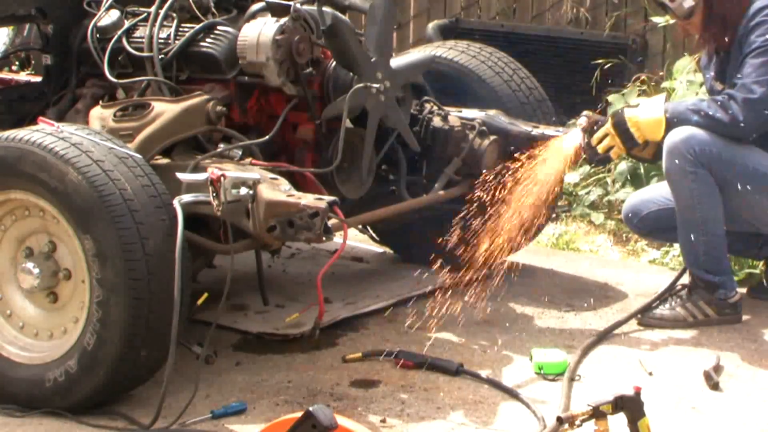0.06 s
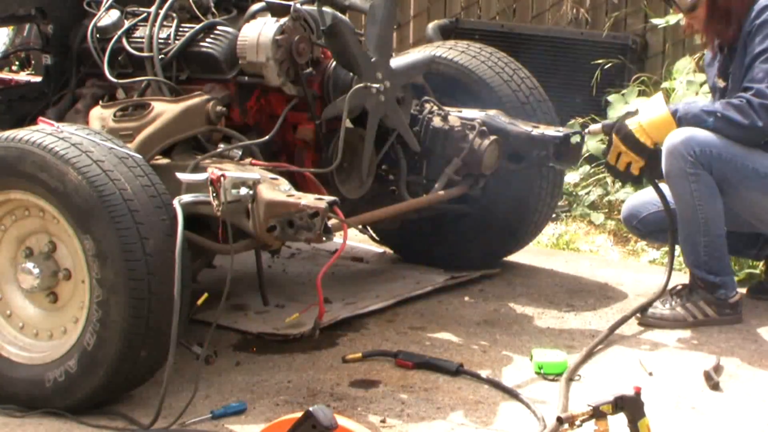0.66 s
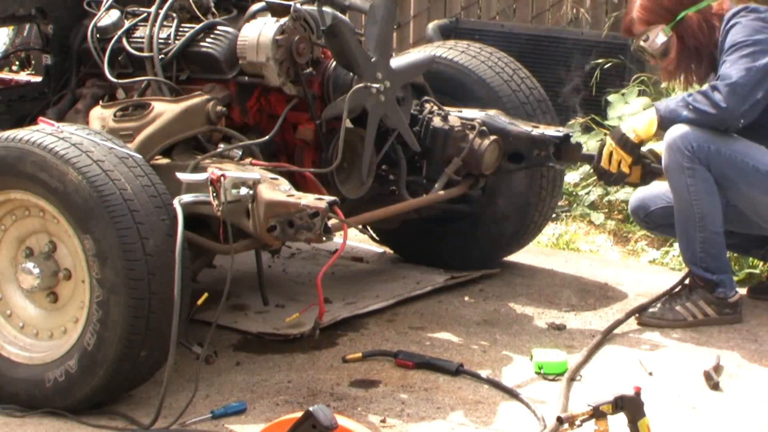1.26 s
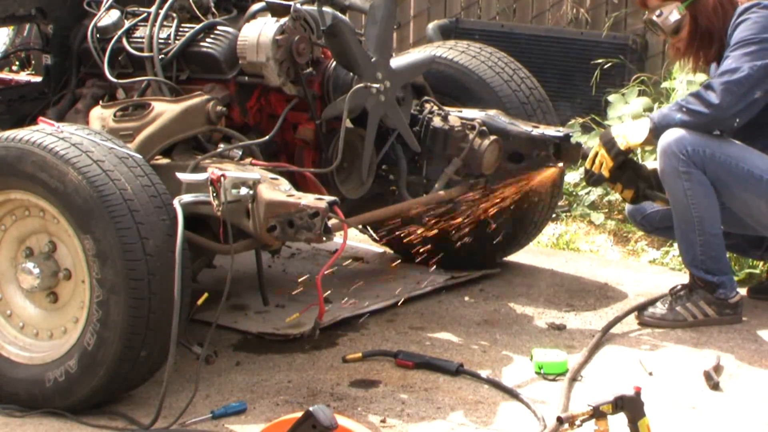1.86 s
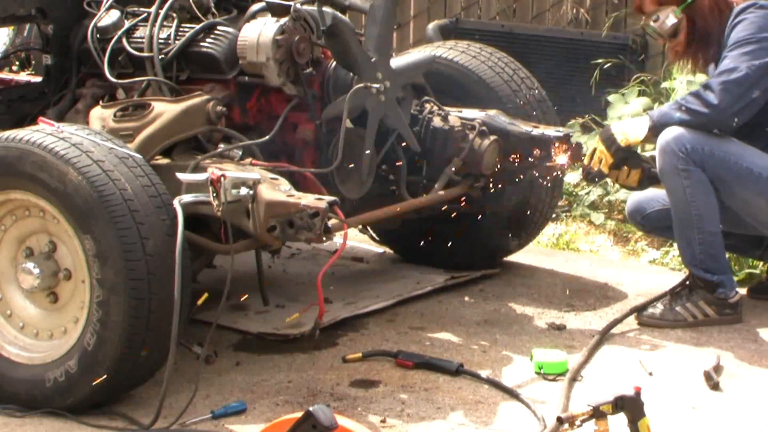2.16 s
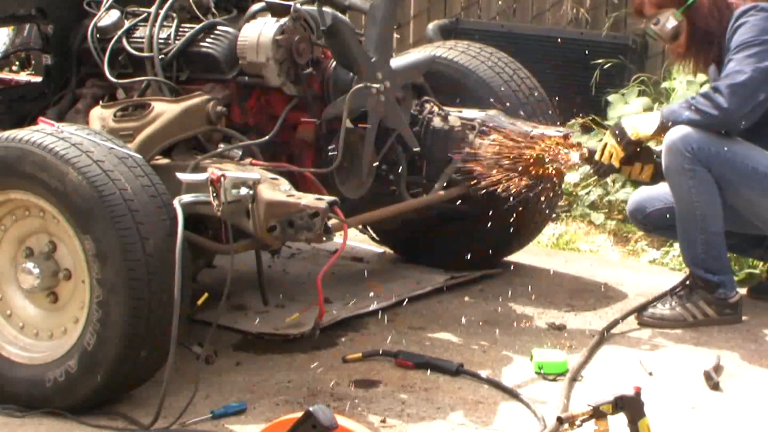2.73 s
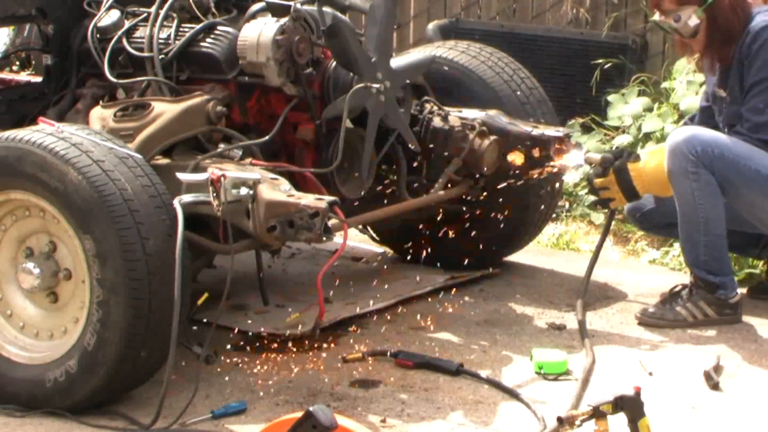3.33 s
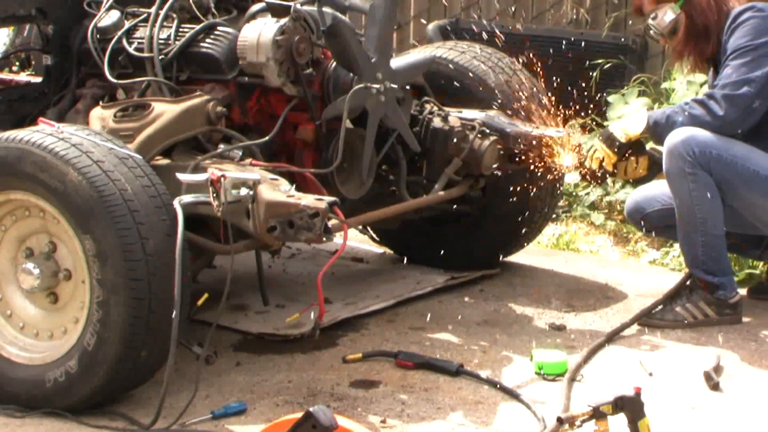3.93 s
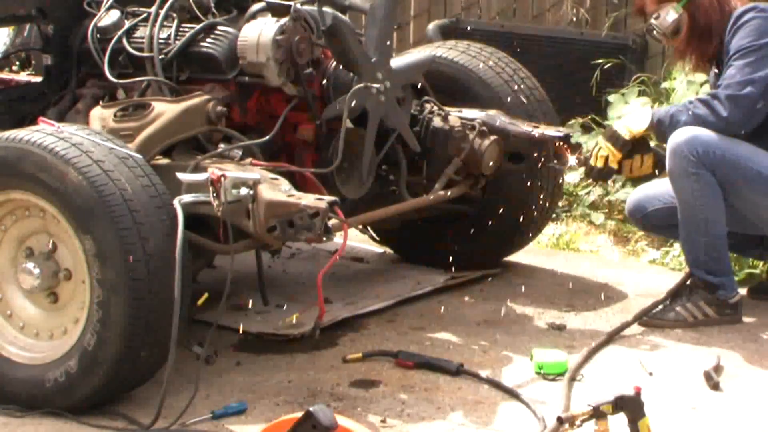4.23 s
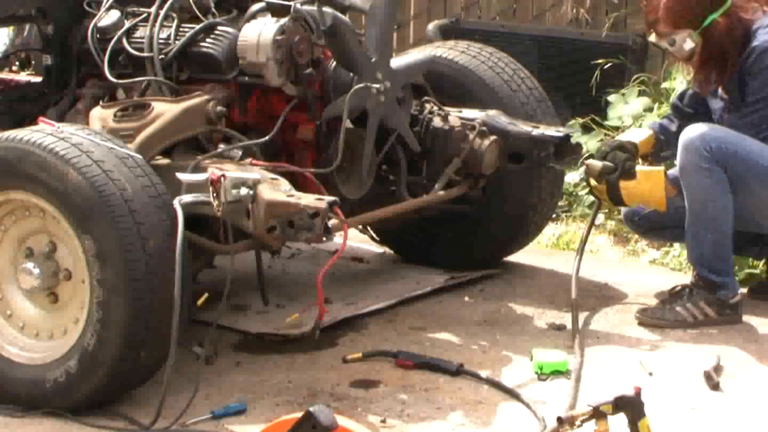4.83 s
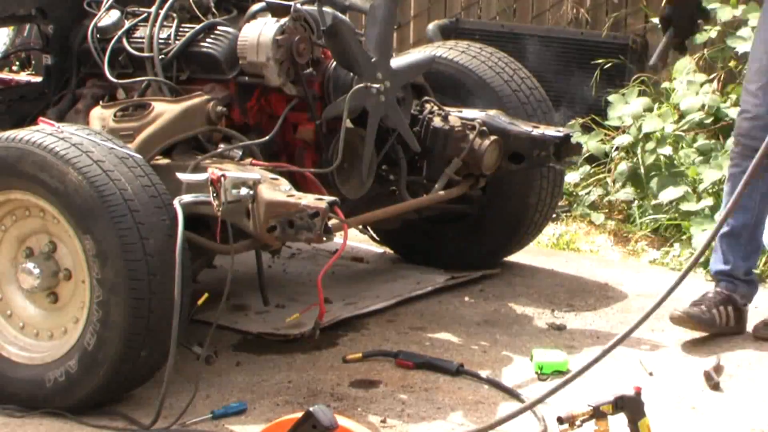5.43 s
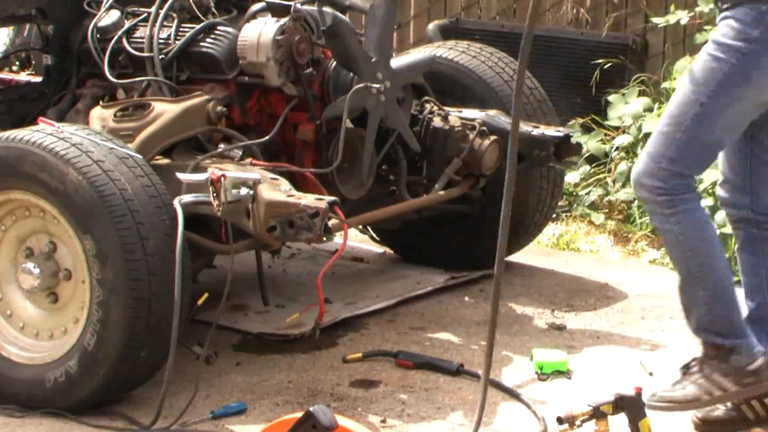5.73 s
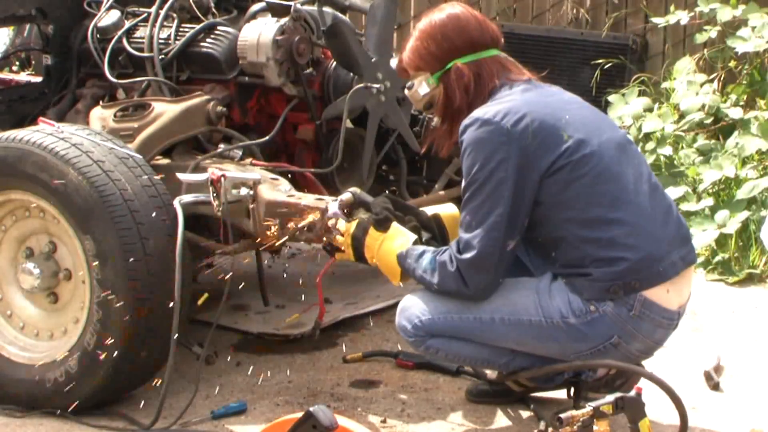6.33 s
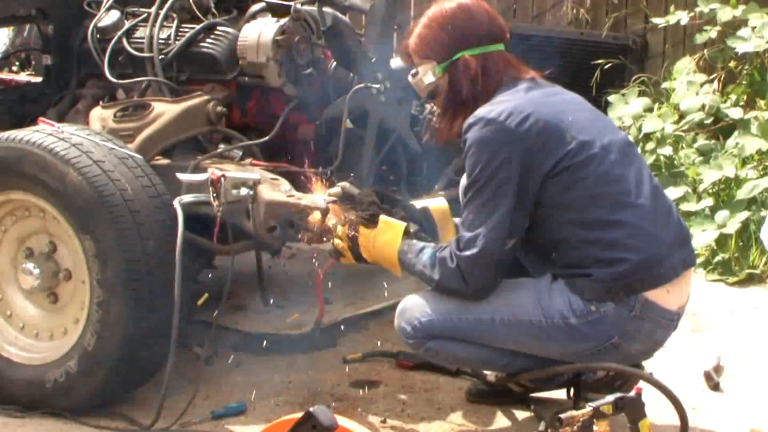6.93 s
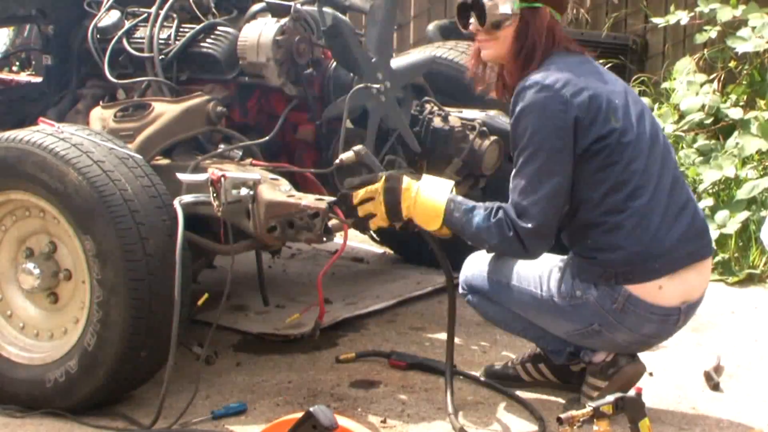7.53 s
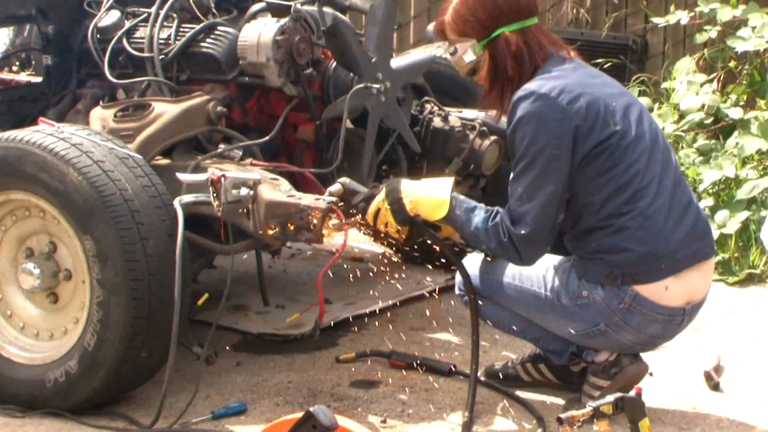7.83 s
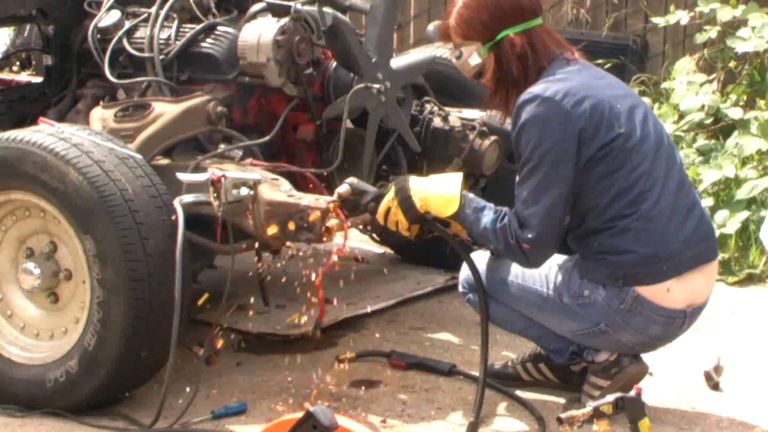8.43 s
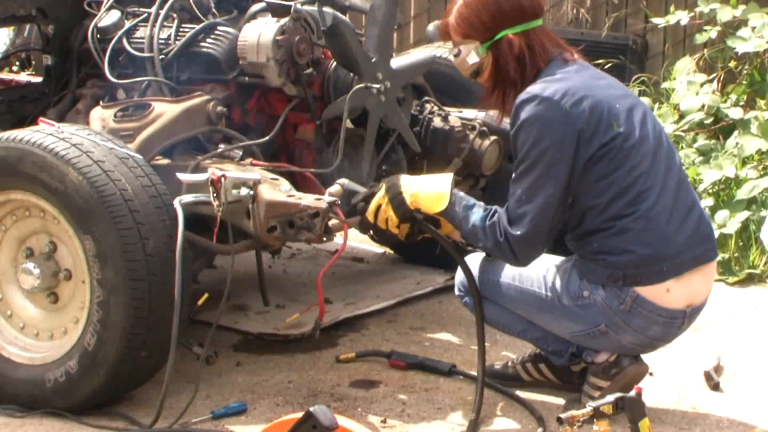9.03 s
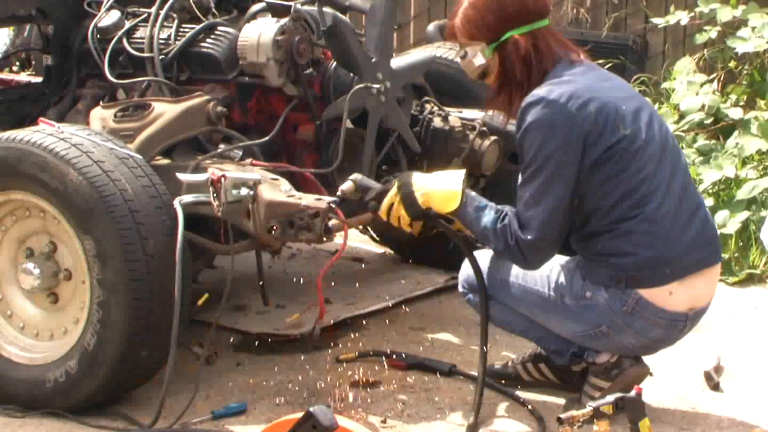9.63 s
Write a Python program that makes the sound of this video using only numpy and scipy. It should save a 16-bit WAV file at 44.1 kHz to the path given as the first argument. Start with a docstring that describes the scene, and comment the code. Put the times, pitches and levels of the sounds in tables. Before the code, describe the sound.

Outdoors in a yard, a plasma cutter works on a steel car frame, its air jet hissing and roaring with a fine spit of sparks. Short stabs and longer cuts follow, each led by a dry trigger click, while the machine hums and its fan rushes behind. Steel tinks once early on. A thin, raspy whine joins before halfway and stays through the longer closing cuts. One stereo microphone hears the torch slightly to the right.

```python
"""A yard, one stereo microphone on a plasma cutter at work on a steel car frame. A cut is under way:
the air jet hisses, roars on the steel and spits sparks, with the machine's hum and fan behind it.
Short stabs and longer cuts follow, each led by a click of the torch; steel tinks once at 1 s.
Near 4 s the machine starts a thin whine. From 5.5 s the worker crosses to the near side and crouches,
and roar and whine change colour. Throughout, the camera's limiter ducks the machine under each cut."""
import sys
import numpy as np
from scipy import signal
from scipy.io import wavfile
from scipy.ndimage import uniform_filter1d, minimum_filter1d

SR = 44100
rng = np.random.default_rng(int(sys.argv[2]) if len(sys.argv) > 2 else 0)


def pcm_store(signal):
    """Save signal as 16-bit PCM."""
    levels = np.round(np.clip(np.atleast_2d(signal), -1, 1) * 32767)
    wavfile.write(sys.argv[1], SR, levels.astype(np.int16).T)


N = 426888
T = np.arange(N) / SR

# Noise at the microphone. Each row: frequency in Hz, likeness of left and right (clipped to +-1).
STEREO_LIKENESS = [(25, -1.5), (45, 0.6), (80, 0), (150, 0.58), (500, 0.48), (1500, .5), (3000, .5),
                   (8000, 0.28), (13000, 0.25)]
# Its lean to one side. Each row: frequency in Hz, left minus right in dB.
STEREO_LEAN = [(30, 1), (200, -1.4), (700, -0.084), (2500, -0.057), (5000, -0.45), (9000, -1.1),
               (14000, -0.86)]
# The cuts. Each row: start and stop in seconds, hiss, roar and rumble in dB,
# rise and fall in seconds, air escaping afterwards in dB against full flow.
CUTS = [(-.1, 0.422, -32, -41.5, -51.5, .005, 0.016, -14.5),
        (0.575, 0.655, -28, -38, -47, 0.02, .002, -8.5),
        (.844, 0.908, -28.5, -37, -51, 0.025, 0.0085, -14.5),
        (1.61, 1.612, -36.5, -43, -62, 0.0036, 0.012, -10),
        (1.902, 2.006, -31.5, -42.5, -54, .011, .004, -8),
        (2.15, 3.07, -30.5, -42.5, -51, 0.011, 0.014, -35),
        (3.271, 3.442, -31.5, -41, -51.5, 0.01, .0035, -12),
        (3.724, 4.711, -33, -45, -52.5, 0.0045, 0.0032, -8),
        (4.976, 5.167, -27.5, -37.5, -47.5, 0.024, .0026, -13.5),
        (6.256, 7.221, -32.5, -42, -53, .002, 0.0035, -13),
        (7.814, 8.992, -33.5, -42.5, -54, 0.0024, .002, -15),
        (9.16, 9.802, -31, -39.5, -53.5, .002, .003, -26)]
# The jet digs into more steel (+) or skims it (-).
# Each row: centre and half-length in seconds, change of hiss, roar and rumble in dB.
BITES = [(0.345, 0.042, 2.5, 0.5, -3), (2.363, 0.057, 0.5, 2, 5), (2.61, 0.15, 1, 4.5, 2),
         (2.984, .09, -1.5, -1.5, 1.5), (3.742, .02, 0.5, 3, 0), (4.356, .07, -0.5, 0.5, 7.5),
         (4.618, 0.054, 2, 1, 1), (6.5, 0.043, -1, -4.5, -9), (7.053, 0.3, 1.5, 1.5, -1),
         (7.837, 0.053, 7, 6, 10), (7.95, 0.029, -0.5, -2.5, -3), (8.74, 0.073, 1.5, 2, 0),
         (9.533, 0.071, 0.5, -2, 9)]
# Colours of the jet's noises. Each row: frequency in Hz, relative density in dB.
HISS_SPECTRUM = [(800, -19.5), (1700, -9), (2400, -3), (3200, 0), (4500, 1), (5600, -0.5), (6500, 1),
                 (7100, 0), (8700, 1), (9700, 1), (11400, 1.5), (13000, 0.56)]
FAR_ROAR_SPECTRUM = [(60, -14), (200, -0.5), (400, 1), (700, -1.5), (1200, 1.5), (1700, 0), (2400, -4.5),
                     (4500, -33)]
NEAR_ROAR_SPECTRUM = [(60, -13), (200, -3.5), (400, -1), (700, -1), (1000, 1), (1250, -3), (1700, -1.5),
                      (2400, -4.5), (4500, -21)]
RUMBLE_SPECTRUM = [(15, -7), (35, 0), (90, -3.5), (180, -4.5), (300, -11.5), (700, -15.5), (2000, -70)]
# Fuzzy whistles of the nozzle. Each row: centre and width in Hz, relative level in dB.
NOZZLE_WHISTLES = [(10350, 170, -11.5), (7700, 350, -8.5), (6240, 600, -27)]
# Switching tones carried by the arc. Each row: frequency in Hz, level in dB against the hiss.
ARC_TONES = [(7500, -22), (8000, -22), (9000, -24), (10500, -11.5), (11000, -35)]
# Hollows of the frame. Each row: start and stop in seconds, centre and width in Hz, boost in dB.
FRAME_HOLLOWS = [(-.1, .5, 1200, 500, 1), (-.1, .5, 2600, 400, 3), (-.1, .5, 4800, 500, 1.5),
                 (2.1, 3.1, 4430, 700, 0.5), (2.6, 4.716, 6260, 600, 3.5), (3.694, 4.75, 1274, 400, 0.5),
                 (9.101, 9.793, 3360, 398, 3.5)]
# The torch, a little right of centre. Each row: time in seconds, left minus right in dB.
TORCH_PAN = [(0, -1), (2, -1.5), (3.7, -1.7), (4.7, -1.5), (6.3, -1), (7.2, -0.5), (9.68, -1.1)]
# Tones of the idling machine and its fan. Each row: frequency in Hz, level in dB.
HUM_TONES = [(133.2, -64), (166, -67.5), (266.4, -70.5), (301, -76), (398.6, -71.5), (532, -75.5),
             (709.5, -78), (1099.6, -68), (3886, -88), (4285, -70), (4538, -69.5), (7500, -74), (9000, -80),
             (10501, -75), (10717, -71)]
# Rush of fan and yard. Each row: frequency in Hz, relative density in dB.
FAN_SPECTRUM = [(20, 22), (60, 5), (100, -14), (140, 11.5), (200, 17.5), (260, 7), (400, 2.5), (800, 0),
                (1600, -1), (3000, -1), (4200, 2.5), (6000, 1), (9500, 2.5), (14000, -11)]
# Clicks: the torch's trigger, and two further clicks near 0.95 s. Each row: start in seconds, level in dB.
TORCH_CLICKS = [(.554, -32.5), (0.824, -34), (.952, -29), (.985, -52), (1.584, -33.5), (1.875, -32.5),
                (2.128, -32), (3.248, -33.5), (3.697, -32), (4.956, -35.5), (6.229, -35.5), (7.781, -32.5),
                (9.133, -34)]
# Modes of the tink. Each row: frequency in Hz, relative level in dB, seconds to fall by 60 dB.
STEEL_MODES = [(4177, -4, .02), (4420, -11, .015), (5636, -9, .035), (7499, -17, .03), (8600, 1, 0.023),
               (8790, -6, .014)]
# The whine. Each row: harmonic number, relative dB in the open, then with the worker crouched close by.
WHINE_HARMONICS = [(2, -29, -31.5), (4, -25, -25), (5, -9, -9), (6, -16, -15), (7, -14, -13.5), (8, 1, 1),
                   (9, -6.5, -5.5), (10, -8.5, -10), (11, -16.5, -16), (12, -22, -27), (13, -15, -15.5),
                   (14, -18, -16.5), (15, -14.5, -18.5), (16, -12, -17), (17, -18, -9), (18, -20, -27),
                   (19, -12, -34), (20, -16, -19), (22, -18, -13), (23, -21, -19), (24, -11, -19),
                   (25, -13.5, -13), (27, -8, -11), (28, -11.5, -21), (29, -21, -24), (30, -28, -26)]
# Single harmonics swell or fade. Each row: harmonic number, centre and half-length in seconds, dB change.
HARMONIC_SWELLS = [(16, 4.7, 0.57, 12), (16, 8.4, 1, -10), (16, 9.1, 0.31, 8), (19, 4.8, .2, -8),
                   (19, 5.4, 0.28, 7), (25, 5.05, .1, 7), (25, 6.8, 0.38, 13), (25, 8.24, 0.44, 13)]
# The whole whine swells or sinks. Each row: centre and half-length in seconds, change in dB.
WHINE_SWELLS = [(5.026, .1, 3), (6.5, 0.13, -3.5), (7.097, 0.11, 1.5), (8.199, 0.1, -4.5),
                (8.502, .13, 0.5), (8.972, 0.12, -6)]


def gain_of(db):
    return 10 ** (np.asarray(db) / 20)


def unit_rms(x):
    return x / np.sqrt(np.mean(x ** 2) + 1e-20)


def spectrum(points):
    """A function of frequency that joins the points by straight lines on a log axis."""
    point_hz, values = np.transpose(points)
    return lambda hz: np.interp(np.log(hz + 1), np.log(point_hz + 1), values)


def wander(rate_hz):
    """A random drift of about unit size, with rate_hz new values a second."""
    knots = rng.standard_normal(N // 40)
    return np.interp(T * rate_hz, np.arange(len(knots)), knots) * np.sqrt(3 / 2)


def swell(centre_s, half_s):
    """A smooth rise to 1 and fall back."""
    return np.exp(-((T - centre_s) / half_s) ** 2)


def noise(shape_db, patchy_db=0):
    """Stereo noise with the spectrum shape_db(hz), broken into short turbulent patches."""
    hz = np.fft.rfftfreq(1024, 1 / SR)
    a, b, c, d, patches = rng.standard_normal((5, N // 256 + 5, len(hz)), dtype=np.float32)
    patches = unit_rms(uniform_filter1d(uniform_filter1d(patches, size=7, axis=0), size=16, axis=1))
    likeness = np.clip(spectrum(STEREO_LIKENESS)(hz), -1, 1)
    left = a + 1j * b
    right = likeness * left + np.sqrt(1 - likeness ** 2) * (c + 1j * d)
    lean = gain_of(np.outer([.5, -.5], spectrum(STEREO_LEAN)(hz)))[:, None]
    frames = np.array([left, right]) * gain_of(shape_db(hz) + patchy_db * patches) * lean
    x = signal.istft(frames.transpose(0, 2, 1), nperseg=1024, noverlap=768)[1][:, :N]
    return x / x.mean(0).std()


def tone(turns, spread):
    """A sine of unit power that reaches the two capsules spread radians apart."""
    return np.sqrt(2) * np.sin(2 * np.pi * (turns + rng.random()) + np.array([[.5], [-.5]]) * spread)


def air_flow(bleed_s=0.048):
    """The torch's valve opens fast and shuts fast; the hose then bleeds out."""
    flow = np.zeros(N)
    for start, stop, *_, rise, fall, after_db in CUTS:
        since_stop = np.maximum(T - stop, 0)
        bleed = gain_of(after_db) * np.exp(-since_stop / bleed_s)
        flow += np.clip((T - start) / rise, 0, 1) * np.maximum(np.exp(-since_stop / fall), bleed)
    return flow


def jet_levels(bite_s=0.18, flare_s=0.011):
    """Hiss, roar and rumble in dB: softer until the arc bites, flaring as it stretches and breaks."""
    cuts = np.array(CUTS)
    start, stop, *levels_db = cuts[np.searchsorted(cuts[1:, 0], T), :5].T
    shallow_db = -2.5 * np.exp(-np.maximum(T - start, 0) / bite_s)
    flare_db = 1.5 * np.exp(-abs(T - stop) / flare_s)
    bites_db = sum(np.outer(dbs, swell(s, half)) for s, half, *dbs in BITES)
    return np.array(levels_db) + shallow_db + flare_db + bites_db


def sparks(per_s, spread_db, ring_s):
    """Drops of molten steel burst as tiny cracks of very uneven size."""
    sizes = gain_of(spread_db * np.minimum(rng.exponential(1, N), 4))
    bursts = sizes * (rng.random(N) < per_s / SR)
    kind = rng.integers(0, 8, N)
    cracks = rng.standard_normal((8, 3, 256)) * np.exp(-np.arange(256) / SR / ring_s)
    cracks = cracks[:, :2] + cracks[:, 2:]  # left and right share a common part
    return unit_rms(sum(signal.oaconvolve((bursts * (kind == k))[None], crack, axes=1)[:, :N]
                        for k, crack in enumerate(cracks)))


def frame_echo(x, delay_s, share):
    """The steel throws the jet back; the comb drifts as the hand moves the torch."""
    echo_time = T - delay_s * (1 + 0.19 * wander(1.8))
    echo = np.array([np.interp(echo_time, T, channel) for channel in x])
    return (x + share * echo) / np.hypot(1, share)


def nozzle_db(hz):
    """The spectrum of the nozzle's whistles: one soft peak each."""
    return 10 * np.log10(sum(gain_of(db) ** 2 / width / (1 + 2 * ((hz - centre) / width) ** 2) ** 2
                             for centre, width, db in NOZZLE_WHISTLES))


def jet_hiss():
    """Air hisses and whistles out of the nozzle, with sparks and the arc's switching tones."""
    hiss = noise(spectrum(HISS_SPECTRUM), patchy_db=1.5)
    hiss += gain_of(-18.5) * sparks(per_s=260, spread_db=4.0, ring_s=0.00067)
    hiss = frame_echo(hiss, delay_s=0.000727, share=0.13)
    hiss += gain_of(-14 + 2.0 * wander(13)) * noise(nozzle_db)
    return hiss + sum(gain_of(db + 2.0 * wander(25)) * tone(hz * T, spread=1.0) for hz, db in ARC_TONES)


def steel_roar(cross_s=5.5):
    """The jet roars on the steel, first on the far side, then on the microphone's side."""
    crossed = np.clip((T - cross_s) * 2, 0, 1)
    far = noise(spectrum(FAR_ROAR_SPECTRUM), patchy_db=1.05)
    near = noise(spectrum(NEAR_ROAR_SPECTRUM), patchy_db=1.0)
    return frame_echo((1 - crossed) * far + crossed * near, delay_s=0.00133, share=0.21)


def frame_hollows(jet):
    """Each hollow of the frame lifts a band of the jet while the torch points into it."""
    for start, stop, hz, width, db in FRAME_HOLLOWS:
        aimed = np.clip(np.minimum(T - start, stop - T) * 20, 0, 1)
        band = signal.lfilter(*signal.iirpeak(hz, hz / width, SR), jet)
        jet = jet + aimed * (gain_of(db) - 1) * band
    return jet


def torch(flow):
    """Hiss, roar and rumble follow the air flow and flutter as the melt is blown out."""
    hiss_db, roar_db, rumble_db = jet_levels()
    flutter, hand = wander(90), wander(32)  # the hand trembles more slowly than the melt
    jet = gain_of(hiss_db + 0.81 * flutter + 0.97 * hand) * jet_hiss()
    jet += steel_roar() * gain_of(roar_db + flutter + hand + wander(350))
    jet += gain_of(rumble_db + 2 * hand) * noise(spectrum(RUMBLE_SPECTRUM), patchy_db=0.5)
    mains_throb = 1 + 0.02 * np.sin(2 * np.pi * 60 * T)
    pan_db = np.interp(T, *np.transpose(TORCH_PAN))
    return flow * mains_throb * gain_of(np.outer([.5, -.5], pan_db)) * frame_hollows(jet)


def machine_hum():
    """Behind the torch, the machine's wavering hum in the rush of its fan."""
    hum = sum(gain_of(db + 0.62 * wander(5.2)) * tone(hz * T + .07 * wander(5), spread=0.97)
              for hz, db in HUM_TONES)
    return hum + gain_of(-55) * noise(spectrum(FAN_SPECTRUM), patchy_db=1.0)


def torch_clicks(rise_s=0.00085, decay_s=0.0016, leak_s=0.022):
    """Dry snaps, mostly of the torch's trigger ahead of a cut, plus two further clicks near 0.95 s; each is
    followed by a faint leak of air."""
    level = np.zeros(N)
    for start, db in TORCH_CLICKS:
        age = T[T >= start] - start
        snap = np.minimum(age / rise_s, 1) ** 2 * np.exp(-age / decay_s)
        leak = gain_of(-16) * np.exp(-age / leak_s)
        level[T >= start] += gain_of(db) * (snap + leak)
    colour = [(200, 4), (900, 0), (1800, 2), (2600, 5.5), (4000, 5), (6000, 0), (10000, 6), (14000, 0.5)]
    return level * noise(spectrum(colour))


def steel_tink(start_s=1.0155):
    """Steel touches steel: a brief scrape and a few damped modes."""
    age = np.maximum(T - start_s, 0)
    ring = sum(gain_of(db - 60 * age / t60) * np.sin(2 * np.pi * hz * age) for hz, db, t60 in STEEL_MODES)
    scrape = gain_of(-10) * np.exp(-age / .002) * rng.standard_normal((2, N))
    return gain_of(-30.5) * np.minimum(age / .0018, 1) * (ring + scrape)


def machine_whine(flow, start_s=3.89, rise_s=0.046, pitch_hz=472, crouch_s=5.9):
    """A thin, raspy squeal from the machine that sags and shakes while the arc draws power."""
    age = np.maximum(T - start_s, 0)
    unsettled = np.exp(-age / .6)  # it starts flat and soft
    load = uniform_filter1d(np.minimum(flow, 1), size=3000)
    swells_db = sum(db * swell(s, half) for s, half, db in WHINE_SWELLS)
    level = np.minimum(age / rise_s, 1) * gain_of(-38 + swells_db - 3 * unsettled - 1.5 * load)
    hz = pitch_hz + .12 * age - 2.2 * unsettled  # settles, then creeps up
    sag_hz = load * (1.1 + 0.294 * wander(18))
    turns = np.cumsum(hz - sag_hz + 0.12 * wander(60)) / SR
    crouched = np.clip((T - crouch_s) * 2, 0, 1)
    squeal = np.zeros((2, N))
    for k, open_db, crouched_db in WHINE_HARMONICS:
        db = open_db + crouched * (crouched_db - open_db)
        db += sum(change * swell(s, half) for which, s, half, change in HARMONIC_SWELLS if which == k)
        waver_db = (0.18 + 1.4 * load) * wander(5)
        squeal += gain_of(db + waver_db) * tone(k * turns, spread=0.028 * k)
    colour = [(300, -15.5), (1600, -16.5), (2600, -9), (4200, -2), (6200, -8.5),
              (8300, -0.5), (9600, -7), (10700, 4.0), (12300, -6.5), (14000, -2.0)]
    rasp = gain_of(-6.5) * noise(spectrum(colour), patchy_db=0.5)
    return level * (gain_of([[-2.2], [-3.8]]) * squeal + rasp)  # the squeal sits a little left


def scene():
    """The yard at the microphone: the torch, its small sounds and the machine behind it."""
    flow = air_flow()
    return torch(flow) + machine_hum() + torch_clicks() + steel_tink() + machine_whine(flow)


def limiter(x, threshold_db, share, recovery_db_per_s):
    """Gain falls fast by a share of the excess level, holds for a moment, then recovers."""
    power_db = 10 * np.log10(abs(uniform_filter1d((x ** 2).mean(0), size=300)) + 1e-12)
    held_db = -minimum_filter1d(-power_db, size=1501, origin=750)
    recovery_db = T * recovery_db_per_s
    envelope_db = np.maximum.accumulate(held_db + recovery_db) - recovery_db
    over_db = np.maximum(envelope_db - threshold_db, 0)
    smoothed_db = signal.lfilter([1 / 150], [1, 1 / 150 - 1], over_db)
    return x / gain_of(share * smoothed_db)


def record(dry):
    """After the microphone: the camera's limiter, then its band limit."""
    limited = limiter(dry, threshold_db=-32.5, share=0.61, recovery_db_per_s=110)
    lowpass = signal.firwin(1023, cutoff=14330, window=("kaiser", 9), fs=SR)
    return signal.oaconvolve(limited, lowpass[None], "same")


dry = scene()
out = record(dry)
pcm_store(out)
```